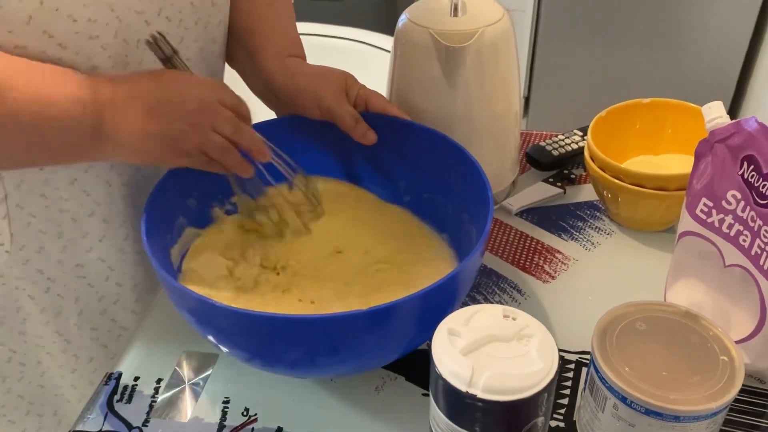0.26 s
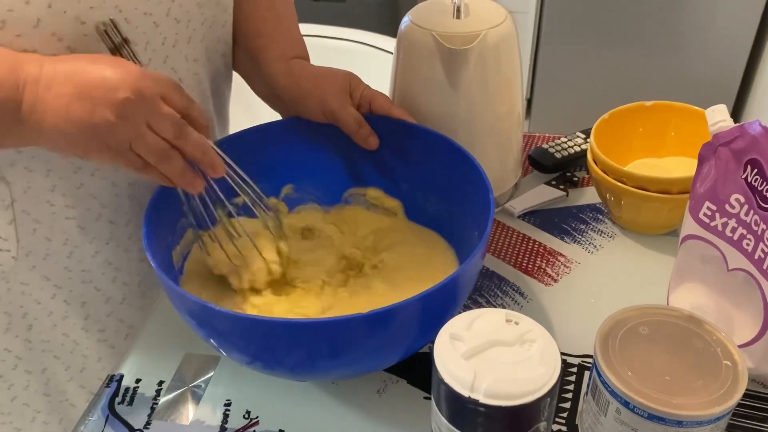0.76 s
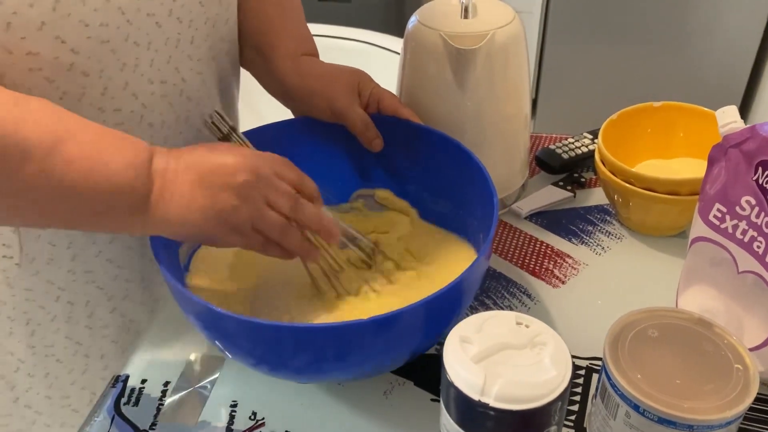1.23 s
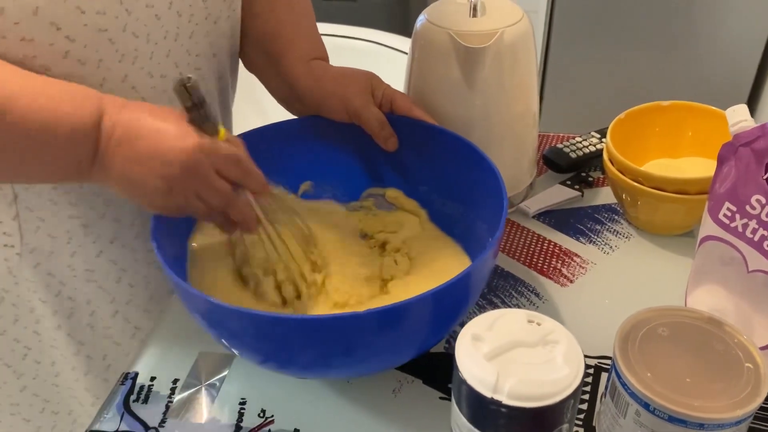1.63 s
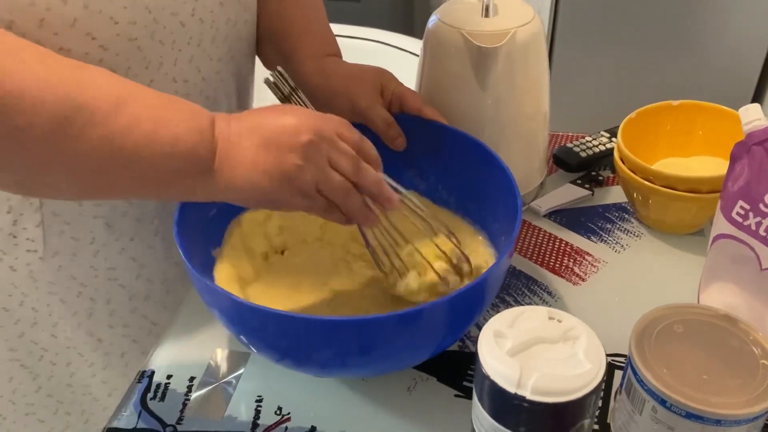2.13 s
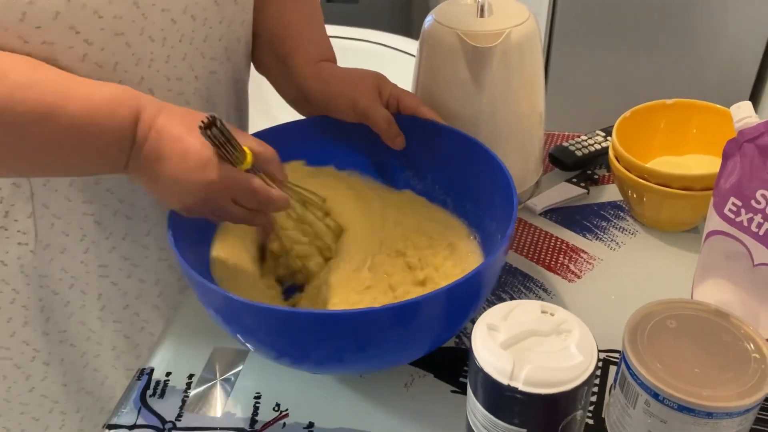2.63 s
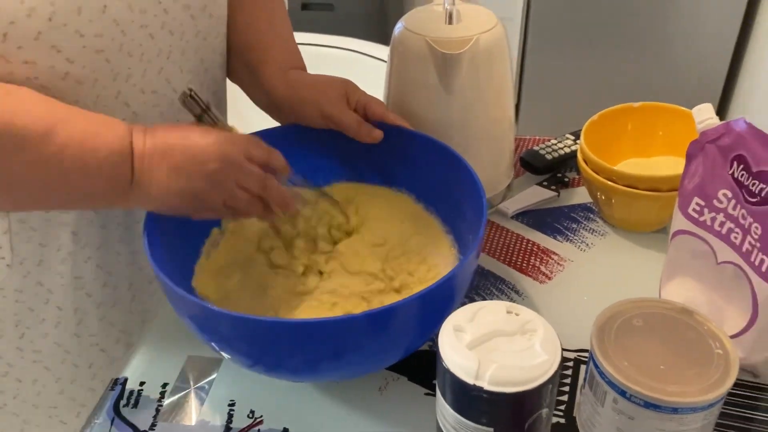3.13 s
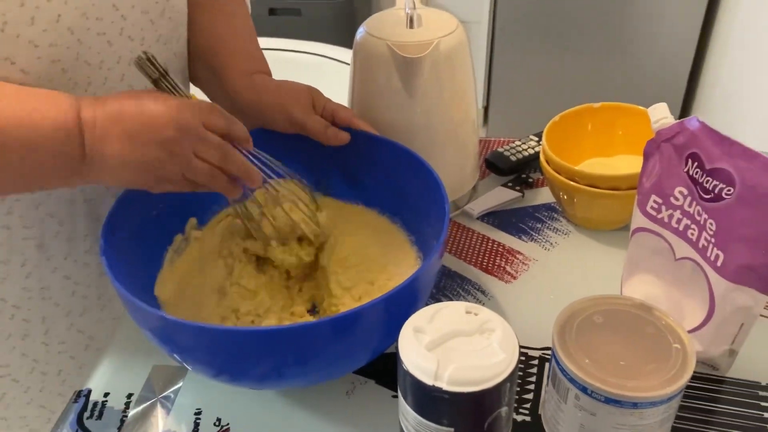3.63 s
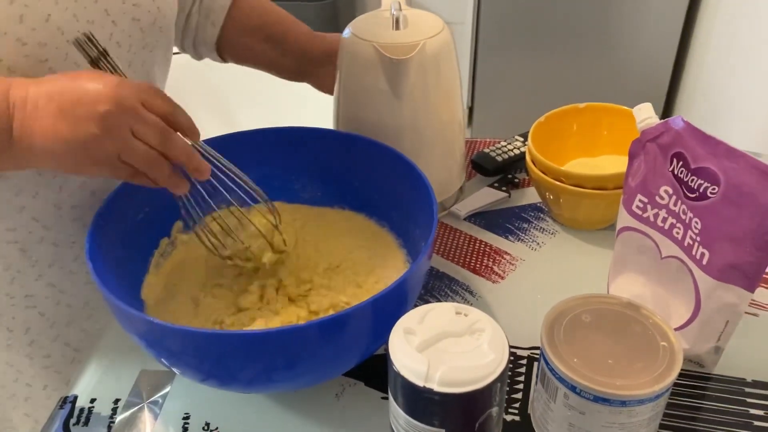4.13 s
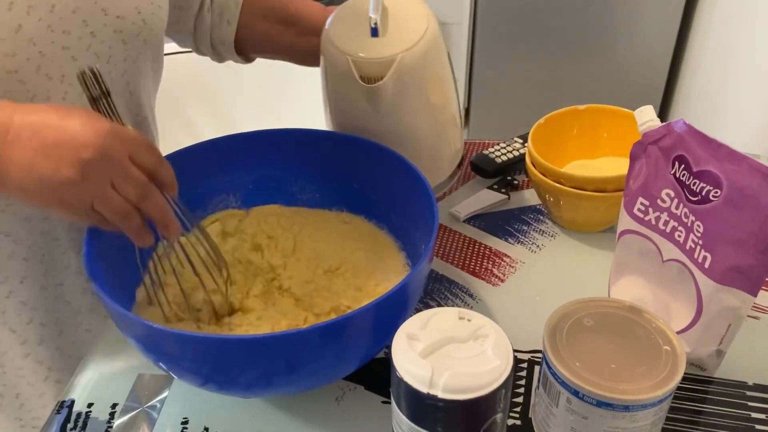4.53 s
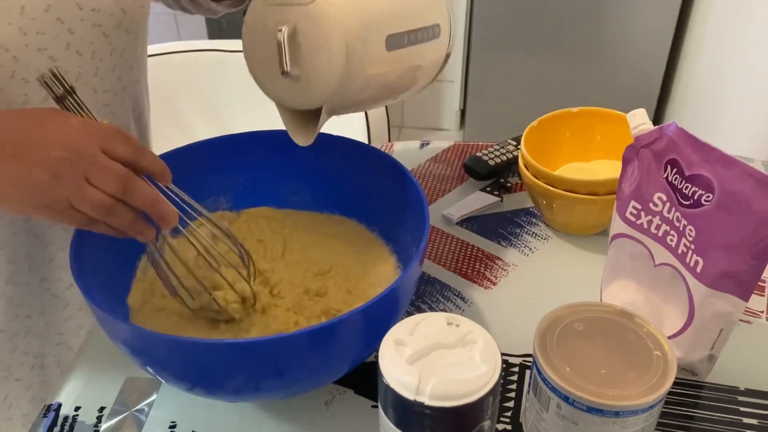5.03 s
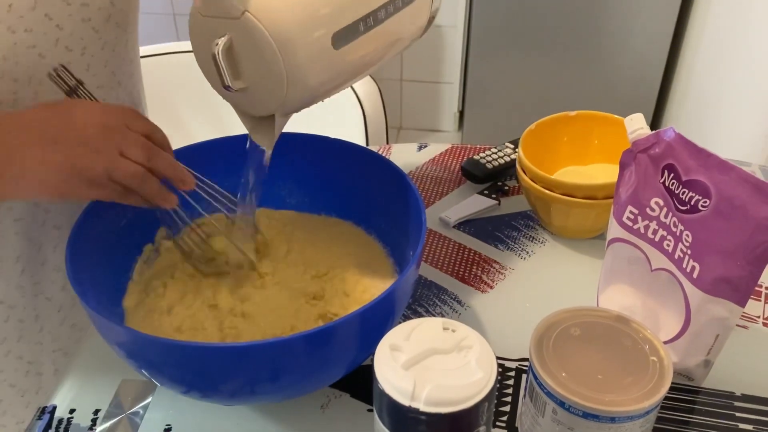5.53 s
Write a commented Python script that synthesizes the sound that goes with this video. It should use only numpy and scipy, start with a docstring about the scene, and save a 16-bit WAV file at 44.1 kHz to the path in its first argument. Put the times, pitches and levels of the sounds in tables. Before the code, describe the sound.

A wire whisk beats thick batter in a plastic bowl, close by in a quiet kitchen. Its scraping, squelching strokes are dotted with wet clicks, knocks on the bowl and dull thuds through the table. The strokes are strongest at first, then turn shorter and lighter. Near the end, water is poured in with a fizzing, bubbling splash as the whisk goes on. A faint low hum lies underneath.

```python
"""Whisking batter in a plastic bowl

A wire whisk is dragged through thick batter: friction and impacts excite the modes of the bowl wall,
films of batter snap and air pockets pop. The kitchen table shudders under the load; late on, water
is poured in. Two appliance tones near 100 Hz beat slowly over the air of the room."""
import sys
import numpy as np
from scipy import signal
from scipy.fft import rfft, irfft, next_fast_len
from scipy.io import wavfile
from scipy.ndimage import uniform_filter1d

SR = 44100
rng = np.random.default_rng(int(sys.argv[2]) if len(sys.argv) > 2 else 0)


def wav_out(sig):
    """Save sig, one row per channel (or a flat mono array), as 16-bit PCM at SR to the path in sys.argv[1]."""
    wavfile.write(sys.argv[1], SR, np.round(np.clip(np.atleast_2d(sig).T, -1, 1) * 32767).astype(np.int16))


N = 254970
TIME = np.arange(N) / SR


def amp(db):
    """Amplitude ratio of a level in decibels."""
    return 10 ** (np.asarray(db) / 20)


def unit_rms(x):
    """Normalisation to unit mean power."""
    return x / np.sqrt(np.mean(x ** 2) + 1e-20)


def curve_at(points, hz):
    """Interpolation on a logarithmic frequency axis."""
    f, value = np.transpose(points)
    return np.interp(np.log(hz + 1), np.log(f + 1), value)


def add(mix, start, sound):
    """Superposition of a sound from its start time in seconds."""
    part = mix[round(start * SR):][:len(sound)]
    part += sound[:len(part)]


def resonate(x, hz, width):
    """Second-order resonance of peak gain 1 and bandwidth `width` in Hz."""
    q = max(hz / min(width, SR / 3), 0.3)
    return signal.lfilter(*signal.iirpeak(np.clip(hz, 20, 15000), q, SR), x)


def modal_sum(x, modes):
    """Modal superposition; neighbouring modes alternate in sign."""
    return sum((-1) ** k * amp(db) * resonate(x, hz, width) for k, (hz, width, db) in enumerate(modes))


def colour(x, gain):
    """Linear filtering by the frequency response gain(hz)."""
    size = next_fast_len(N)
    return irfft(rfft(x, size) * gain(np.fft.rfftfreq(size, 1 / SR)), size)[..., :N]


def envelope(start, rise, hold, sag_db_per_s, release_db_per_s):
    """Linear attack, then exponential change at one rate while held and another on release."""
    t = TIME - start
    held = np.clip(t - rise, 0, max(hold, 0))
    released = np.maximum(t - rise - held, 0)
    return np.clip(t / max(rise, 0.001), 0, 1) * amp(sag_db_per_s * held + release_db_per_s * released)


def wander(cutoff_hz):
    """Slow random modulation: low-passed noise of unit power."""
    return unit_rms(signal.lfilter(*signal.butter(1, cutoff_hz, fs=SR), rng.standard_normal(N)))


def jolts(per_s, spread_db):
    """Poisson impulse train of random sign and exponentially distributed level."""
    size = amp(spread_db * np.minimum(rng.exponential(1, N), 5)) * rng.choice([-1., 1.], N)
    return unit_rms(size * (rng.random(N) < per_s / SR))


# Spectrum of the room noise: f/Hz, relative level/dB
AIR_SPECTRUM = [(15, -62), (25, -0.5), (118, -6), (183, -12.5), (243, -7), (367, -16), (1110, -27.5),
                (1820, -27), (4730, -40), (5820, -63), (9270, -58), (10800, -54), (12000, -77)]
# Its left-right correlation: f/Hz, coefficient
AIR_CORRELATION = [(60, 0.22), (180, 0.76), (550, -0.39), (1650, 0.24), (4970, -0.029), (15000, -0.32)]
def air():
    """Partial coherence: steady kitchen noise, alike in both channels only in the bass."""
    left, independent = rng.standard_normal((2, N))
    likeness = lambda hz: np.clip(curve_at(AIR_CORRELATION, hz), -1, 1)
    right = colour(left, likeness) + colour(independent, lambda hz: np.sqrt(1 - likeness(hz) ** 2))
    noise = colour(np.array([left, right]), lambda hz: amp(curve_at(AIR_SPECTRUM, hz)) * (hz < 12500))
    return amp(-58) * unit_rms(noise)


HUM_HZ, BEAT_HZ, FIRST_MINIMUM_S = 100.02, 1.197, 0.09
def appliance_hum():
    """Beating: two close tones partly cancel once in each period of their difference frequency."""
    t = TIME - FIRST_MINIMUM_S
    upper, lower = (np.sin(2 * np.pi * hz * t) for hz in (HUM_HZ, HUM_HZ - BEAT_HZ))
    return np.sqrt(2) * (amp(-56) * upper - amp(-58) * lower)


# The bowl presses on the table: t/s, hold/s, level slope/(dB/s), level/dB
PRESSES = [(0, 0.034, -6, -55.5), (0.139, 0.15, 10, -47), (0.398, 0.17, -10, -63), (0.906, 0.23, -10, -51),
           (1.557, 0.16, -34, -53), (1.826, 0.39, -18.5, -60), (2.33, 0.035, -1, -60),
           (2.488, 0.11, -1, -61), (2.9, 0.33, 10, -59), (3.322, 0.27, -29, -48), (3.723, 0.1, 3, -62.5),
           (4.248, 0.033, 0, -47.5), (4.351, 0.021, -2, -36), (4.45, 0.078, -61, -50),
           (4.708, 0.037, -6, -58.5), (4.85, 0.16, -5, -60), (5.195, 0.34, -2, -63.5), (5.7, .05, 0, -56)]
def table_shudder():
    """Forced vibration: one narrow mode of the table top rings evenly while the bowl presses on it."""
    mode = resonate(rng.standard_normal(N), hz=138.9, width=1.46)
    power = sum((amp(db) * envelope(start, 0.033, hold, sag, release_db_per_s=-200)) ** 2
                for start, hold, sag, db in PRESSES)
    running_power = uniform_filter1d(mode ** 2, size=3000) + 1e-12
    return mode * np.sqrt(power / running_power)


SWAY_HZ = 57
# Modes of the table top: f/Hz, bandwidth/Hz, gain/dB
TABLE_MODES = [(221.5, 45, -2), (298, 37.6, 4.5), (331, 153, -5)]
# Heavy blows: t/s, peak level/dB, centre f/Hz, frame sway re peak/dB
THUDS = [(0.164, -43.5, 269, -10), (0.929, -40, 184, -7), (1.585, -45, 174, -8), (2.219, -46, 263, -18),
         (3.299, -32, 264, -4.5), (3.494, -40.5, 300, -10), (3.724, -41.5, 238, -12),
         (4.364, -33.5, 236, -11), (4.409, -40, 290, -21), (4.449, -44, 263, -6), (5.388, -43.5, 222, -22),
         (5.65, -40.5, 257, -14), (5.673, -39, 287, -28), (5.722, -46, 285, -23)]
def table_thuds():
    """Structure-borne sound: blows pass through the bowl, ring the table top and sway its frame."""
    out, t = np.zeros(N), np.arange(14000) / SR
    for start, db, hz, sway_db in THUDS:
        push = rng.standard_normal(len(t)) * amp(-60 * t / 0.1) * np.minimum(t / 0.002, 1)
        push[60] += 30  # the blow itself
        top = modal_sum(push, TABLE_MODES) + 0.097 * resonate(push, 367, 180)
        top = resonate(top, hz, 0.57 * hz)
        frame = resonate(resonate(rng.standard_normal(len(t)), SWAY_HZ, 30), SWAY_HZ, 45)
        sway = amp(-60 * t / 0.26) * np.minimum(t / 0.023, 1) * unit_rms(frame)
        add(out, start, amp(db) * (top / abs(top).max() + amp(sway_db) * sway))
    return out


def squelch(per_s, low_hz, high_hz):
    """Bubble resonance: many small air pockets each ring for a few cycles at their own pitch."""
    out, t = np.zeros(N), np.arange(600) / SR
    for hz in np.geomspace(low_hz, high_hz, num=24):
        cycles = t * hz
        pocket = cycles * np.exp(-cycles / 2.1) * np.sin(2 * np.pi * cycles * (1 + 0.01 * cycles))
        out += signal.oaconvolve(jolts(per_s / 24, spread_db=2.2), pocket / np.linalg.norm(pocket))[:N]
    return unit_rms(out)


# Spectrum of the wet fizz: f/Hz, relative level/dB
FIZZ_SPECTRUM = [(2200, -7), (3000, -5.5), (4500, -4), (6000, -3), (8000, -5.5), (10000, -3),
                 (11500, -22.5), (12500, -46)]
def fizz():
    """Shot noise: dense tiny impulses and small bubbles merge into a wet, flickering hiss."""
    hiss = colour(jolts(per_s=6000, spread_db=-0.5), lambda hz: amp(curve_at(FIZZ_SPECTRUM, hz)))
    return amp(1.34 * wander(17)) * (unit_rms(hiss) + 0.63 * squelch(500, 3130, 9560))


# Spray of the poured water: t/s, level/dB
POUR = [(5.25, -81), (5.262, -66), (5.365, -67.5), (5.39, -70), (5.48, -65), (5.55, -52.5), (5.6, -46),
        (5.67, -42.5), (5.74, -46), (5.78, -49)]
def poured_water():
    """Air entrainment: the water fizzes and bubbles as it is poured in."""
    gain = amp(np.interp(TIME, *np.transpose(POUR), left=-200))
    return gain * (fizz() + 0.73 * squelch(200, 2630, 3960))


# Air pockets close in batter and water: t/s, level/dB, f/Hz, duration/s
POPS = [(0.533, -40.5, 1420, 0.0051), (2.236, -48, 2040, 0.014), (2.278, -44, 1360, 0.015),
        (2.352, -37.5, 952, 0.013), (3.35, -52, 970, 0.0067), (4.728, -63, 1600, 0.032),
        (4.927, -52, 1440, 0.013), (5.183, -56, 787, 0.031), (5.376, -31, 2150, 0.0059),
        (5.416, -49, 1005, 0.016), (5.451, -45, 1025, 0.026), (5.53, -46, 1045, 0.029),
        (5.559, -34, 3170, 0.01), (5.569, -37, 3360, 0.0053), (5.589, -41, 3700, 0.0064),
        (5.616, -34, 3280, 0.0052), (5.644, -38, 3680, 0.011), (5.71, -30.5, 726, 0.0081),
        (5.732, -31, 3560, 0.0051), (5.7473, -25.5, 3780, 0.0039), (5.771, -32.5, 2150, 0.0056)]
def bubble_pops():
    """Bubble resonance: a short tone rises as the pocket shrinks, in a splash of noise near its pitch."""
    out, t = np.zeros(N), np.arange(3000) / SR
    for start, db, hz, duration in POPS:
        age = t / max(duration, 0.003)
        tone = np.sin(2 * np.pi * hz * t * (1 + 0.023 * age))
        splash = unit_rms(resonate(rng.standard_normal(len(t)), hz, 0.44 * hz))
        swell = 4 * age * np.exp(1 - 4 * age)
        add(out, start, amp(db) * swell * (tone + 0.38 * splash))
    return out


SNAP_T60_S, SPRAY_T60_S = 0.007, 0.51
# Films of batter snap off the wires: t/s, peak level/dB, centre f/Hz
TICKS = [(0.076, -43, 9100), (0.154, -18, 3900), (0.326, -32.5, 5540), (0.689, -40, 4170),
         (0.785, -40.5, 6140), (1.8, -36.5, 6900), (2.1165, -45.5, 5400), (2.7367, -44.5, 9050),
         (2.7597, -45, 8900), (2.804, -43.5, 6000), (2.904, -40.5, 3900), (2.9536, -40.5, 5240),
         (2.96, -47, 7000), (2.9847, -39, 7400), (2.9925, -36.5, 11000), (3.0305, -37, 5540),
         (3.086, -47.5, 5300), (3.1068, -43, 9100), (3.181, -37, 3280), (3.414, -37, 3600),
         (3.5272, -42.5, 7380), (3.6057, -46.5, 6000), (3.753, -34, 5700), (3.8822, -35.5, 5400),
         (3.9717, -35.5, 4300), (3.999, -37, 7050), (4.131, -46, 7020), (4.154, -48, 5880),
         (4.173, -23, 5540), (4.205, -35.5, 3330), (4.4484, -36, 4200), (4.7352, -42, 8150),
         (4.752, -40, 10500), (4.895, -48, 3150), (4.931, -51.5, 9600), (5.031, -47, 7450),
         (5.046, -53, 6700), (5.069, -46, 8700), (5.086, -48, 6200), (5.1, -38.5, 7800), (5.127, -37, 5960),
         (5.155, -47.5, 6070), (5.257, -36, 7000), (5.296, -37, 10500), (5.3318, -37, 4300),
         (5.3837, -32, 4870), (5.4184, -31, 3800), (5.452, -33.5, 4030), (5.501, -37, 5260),
         (5.5346, -29, 5630), (5.6453, -22.5, 5530), (5.67, -21.5, 4400), (5.68, -18.5, 8600),
         (5.73, -20.5, 5700)]
def batter_ticks():
    """Film rupture: each break radiates a brief band of noise, followed by a faint spray."""
    out, t = np.zeros(N), np.arange(3000) / SR
    decay = amp(-60 * t / SNAP_T60_S) + 0.05 * amp(-60 * t / SPRAY_T60_S)
    for start, db, hz in TICKS:
        burst = rng.standard_normal(len(t)) * np.minimum(t / 0.00071, 1) * decay
        burst[16] += 3.5  # the break itself
        snap = resonate(resonate(burst, hz, 0.4 * hz) + 0.1 * burst, hz, hz)
        add(out, start, amp(db) * snap / abs(snap).max())
    return out


CONTACT_T60_S, RATTLE_T60_S = 0.0015, 0.045
# Modes of the bowl wall, damped by batter: f/Hz, bandwidth/Hz, gain/dB
WALL_MODES = [(520, 140, 0.5), (642, 39, 4.5), (787, 316, -1), (1000, 170, 4), (1393, 350, 4),
              (1693, 530, 2.5), (2093, 340, 4), (2360, 197, 6), (2774, 460, -1), (3160, 380, 3),
              (3650, 1360, -1)]
# Wires strike the wall: t/s, peak level/dB, centre f/Hz
KNOCKS = [(0.154, -15, 2070), (0.154, -24.5, 630), (0.824, -28.5, 840), (0.929, -26, 1030),
          (1.582, -40.5, 560), (1.784, -39, 1390), (2.216, -36.5, 756), (2.959, -37.5, 1250),
          (3.027, -33, 1060), (3.295, -29, 890), (3.483, -36.5, 1060), (3.695, -44.5, 789),
          (3.723, -42, 2370), (3.754, -32.5, 2100), (4.36, -31.5, 670), (4.449, -40, 1690),
          (4.467, -39, 1240), (5.134, -41, 1120), (5.645, -35, 750), (5.679, -33, 890)]
def wire_knocks():
    """Impact excitation: a sharp contact and a short rattle, cushioned by batter, ring the wall."""
    out, t = np.zeros(N), np.arange(8000) / SR
    decay = amp(-60 * t / CONTACT_T60_S) + 0.26 * amp(-60 * t / RATTLE_T60_S)
    for start, db, hz in KNOCKS:
        force = rng.standard_normal(len(t)) * decay
        force[20] += 6  # the contact itself
        cushioned = signal.lfilter(*signal.butter(3, min(3 * hz, 9000), fs=SR), force)
        wall = resonate(modal_sum(cushioned, WALL_MODES) + 0.16 * cushioned, hz, 0.6 * hz + 150)
        add(out, start, amp(db) * wall / abs(wall).max())
    return out


def rubbed_wall(force, modes, focus_hz, reach, floor, flicker_db):
    """Modal weighting: modes near the focus ring most, each coming and going as the batter shifts."""
    weights = [np.exp(-(np.log(hz / focus_hz) / reach) ** 2) + floor for hz, _, _ in modes]
    total = np.sqrt(sum(weight ** 2 for weight in weights))
    out = np.zeros(N)
    for k, (weight, mode) in enumerate(zip(weights, modes)):
        flicker = amp(flicker_db * wander(17.5))
        out += (-1) ** k * weight / total * flicker * modal_sum(force, [mode])
    return unit_rms(out)


# Strokes along the wall: t/s, rise/s, hold/s, upper-mode level slope/(dB/s),
# lower-mode level/dB, lower-mode focus f/Hz, upper-mode level/dB, fizz level/dB
STROKES = [(0, 0.00088, 0.2, -22, -62.5, 700, -70.5, -69.5),
           (0.15, 0.004, 0.4, -19.5, -44.5, 760, -44.5, -55), (.72, 0.11, 0.0092, 9, -75, 805, -63, -59.5),
           (0.811, 0.034, 0.077, -12, -52, 860, -48, -58.5),
           (0.923, 0.0076, 0.16, -67, -43, 610, -46.5, -60.5),
           (1.032, 0.1, 0.043, -9, -55.5, 905, -48, -55), (1.261, 0.013, 0.58, 4, -70, 800, -64, -68),
           (1.428, 0.12, 0.03, 6, -62.5, 540, -73, -63.5), (1.633, 0.014, 0.18, -33, -60, 990, -59, -64.5),
           (1.889, 0.073, 0.13, -8, -61.5, 706, -72.5, -79.5),
           (2.129, 0.097, 0.028, 2, -64, 650, -63.5, -61.5), (2.219, 0.035, 0.25, 5, -57, 850, -53, -58.5),
           (2.472, 0.11, 0.071, -24, -61.5, 830, -50.5, -61.5),
           (2.732, 0.026, 0.15, -22, -72, 680, -69.5, -69.5),
           (3.026, 0.0046, 0.033, -64, -49.5, 695, -61.5, -69),
           (3.087, 0.028, 0.11, -23, -64, 685, -60.5, -65.5),
           (3.297, 0.0036, 0.021, -60, -46, 730, -57.5, -88),
           (3.402, 0.0046, 0.013, -30, -60, 840, -60.5, -59.5),
           (3.481, 0.003, 0.015, -31, -55, 900, -59.5, -67), (3.551, 0.04, 0.18, -19, -69, 640, -67, -66.5),
           (3.717, 0.002, 0.016, -2, -61.5, 920, -55.5, -53),
           (3.887, 0.0021, 0.055, -40, -78, 557, -87, -70),
           (3.972, 0.0049, 0.03, -44, -64.5, 895, -64.5, -63.5),
           (4.07, 0.015, 0.059, 2, -66.5, 695, -85, -75),
           (4.165, 0.0041, 0.14, -39, -59.5, 676, -64.5, -62),
           (4.358, 0.0032, 0.011, -56, -51, 650, -49, -84),
           (4.443, 0.003, 0.0088, -40, -53.5, 587, -57.5, -53.5),
           (4.727, 0.0034, 0.0054, -4, -92, 700, -70, -68), (4.883, 0.017, 0.043, -14, -72, 750, -75, -87),
           (5.019, 0.0092, 0.11, -3, -91, 720, -75, -74.5),
           (5.117, 0.0041, 0.013, -4, -64.5, 860, -59.5, -71.5),
           (5.38, 0.0051, 0.16, -13, -60, 970, -59, -59), (5.523, 0.015, 0.11, 3, -60.5, 1020, -51, -69),
           (5.643, 0.0054, 0.16, -42, -43.5, 800, -51, -61)]
def stroke_gains():
    """Incoherent addition: strokes sum in power, giving three gains and a power-weighted lower focus."""
    low, weighted_hz, high, wet = np.full((4, N), 1e-20)
    for start, rise, hold, sag, low_db, focus_hz, high_db, fizz_db in STROKES:
        low_power = (amp(low_db) * envelope(start, rise, hold, 1.87 * sag, release_db_per_s=-190)) ** 2
        low += low_power
        weighted_hz += focus_hz * low_power
        high += (amp(high_db) * envelope(start, rise, hold, sag, release_db_per_s=-190)) ** 2
        wet += (amp(fizz_db) * envelope(start, rise, hold, 0.61 * sag, release_db_per_s=-110)) ** 2
    return np.sqrt(low), np.sqrt(high), np.sqrt(wet), weighted_hz / low


WALL_CUTOFF_HZ = 9200
# The focus of the upper modes follows the place where the wires touch: t/s, f/Hz
UPPER_FOCUS = [(.22, 2120), (.31, 1410), (.95, 2040), (1.1, 1460), (2.25, 2050), (2.46, 2730), (2.6, 1840),
               (4.4, 1710), (5.4, 2200)]
def whisk_strokes():
    """Stick-slip friction: wires slip over sugar grains and shake the wall; the wet batter fizzes."""
    low_gain, high_gain, fizz_gain, low_hz = stroke_gains()
    high_hz = np.interp(TIME, *np.transpose(UPPER_FOCUS))
    slips = jolts(per_s=5000, spread_db=3)
    low = rubbed_wall(slips, WALL_MODES[:4], low_hz, reach=0.23, floor=0.5, flicker_db=3.2)
    low += 0.25 * squelch(150, 530, 1170)
    high = rubbed_wall(slips, WALL_MODES[4:], high_hz, reach=0.2, floor=0.6, flicker_db=2.6)
    high += 0.45 * squelch(300, 1217, 3050)
    low, high = colour(np.array([low, high]), lambda hz: 1 / (1 + (hz / WALL_CUTOFF_HZ) ** 10))
    return low_gain * low + high_gain * high + fizz_gain * fizz()


# Level difference at the microphone ports: f/Hz, left minus right/dB
PORT_LEVEL = [(400, -4), (1000, 0.5), (2500, -1.5), (5000, -2.5), (9000, 1.5)]
# Phase difference at the ports: f/Hz, lead of left/rad
PORT_PHASE = [(400, 0), (650, -.5), (1120, .5), (1810, .2), (2500, 1.3), (3880, .8), (4650, 2.3),
              (5250, 5.5), (6460, 7.1), (9470, 8.4), (11300, 9.3)]
def direct_sound(x):
    """Level and phase differences: each microphone port hears the bowl with its own gain and lag."""
    side = np.array([[0.5], [-0.5]])
    gain = lambda hz: amp(side * curve_at(PORT_LEVEL, hz))
    return colour(x[None], lambda hz: gain(hz) * np.exp(1j * side * curve_at(PORT_PHASE, hz)))


# Reverberation time of the kitchen: f/Hz, T60/s
ROOM_T60 = [(100, 0.7), (1000, 0.27), (4000, 0.23), (12000, 0.054)]
def room(x):
    """Reverberation: sparse echoes of random sign, each band decaying at its own rate."""
    echoes = np.zeros((2, SR // 2))
    delays = np.arange(300, SR // 2 - 20, 20) + rng.integers(0, 20, (2, (SR // 2 - 301) // 20))
    np.put_along_axis(echoes, delays, rng.choice([-1., 1.], delays.shape), 1)
    hz, t, bands = signal.stft(echoes, SR, nperseg=256)
    decay = amp(-60 * t / curve_at(ROOM_T60, hz)[:, None])
    tail = signal.istft(bands * decay, SR, nperseg=256)[1]
    return signal.fftconvolve(x[None], tail / np.linalg.norm(tail[0]), axes=1)[:, :N]


def scene():
    """Superposition: direct and reverberant sound of the bowl over the shudder, hum and air."""
    bowl = whisk_strokes() + poured_water() + wire_knocks() + table_thuds()
    snaps = batter_ticks() + bubble_pops()
    reverberation = room(amp(-8.5) * bowl + amp(-15) * snaps)
    return direct_sound(bowl + snaps) + reverberation + table_shudder() + appliance_hum() + air()


MONO_BELOW_HZ, BAND_LIMIT_HZ = 330, 15900
# Overall tone colour, with deep bass cut, a peak near 11.5 kHz and a dip above it: f/Hz, gain/dB
TONE_COLOUR = [(20, -51), (33, -20), (45, 1.5), (10000, -0.5), (11500, 10.5), (13000, -9), (16000, 5)]
def record(dry):
    """Spectral shaping: bass nearly mono, deep bass removed, top treble uneven and cut near 16 kHz."""
    mid = dry.mean(axis=0)
    width = lambda hz: np.maximum(1 / np.sqrt(1 + (MONO_BELOW_HZ / (hz + 1)) ** 6), 0.1)
    side = colour(dry - mid, width)
    heard = colour(mid + side, lambda hz: amp(curve_at(TONE_COLOUR, hz)))
    lowpass = signal.firwin(511, BAND_LIMIT_HZ, window=("kaiser", 9), fs=SR)
    return signal.oaconvolve(heard, lowpass[None], "same")


dry = scene()
out = record(dry)
wav_out(out)
```